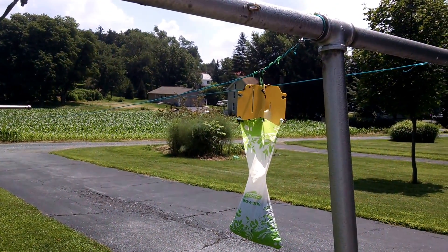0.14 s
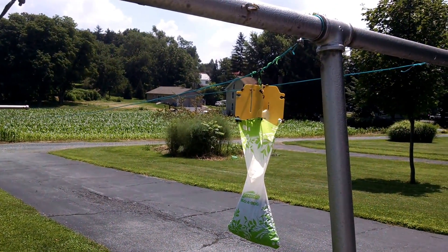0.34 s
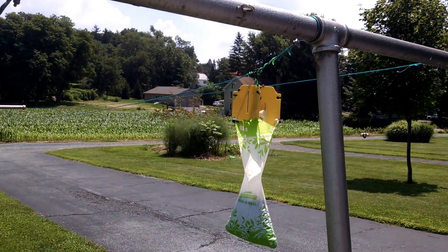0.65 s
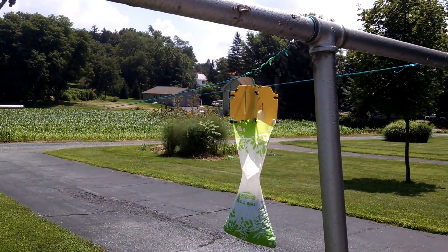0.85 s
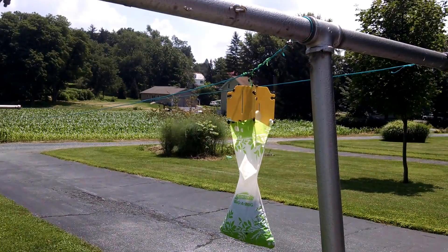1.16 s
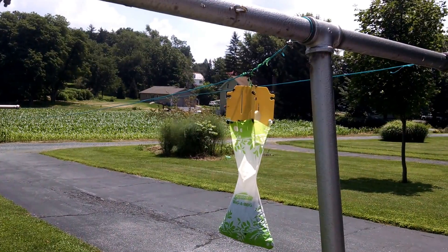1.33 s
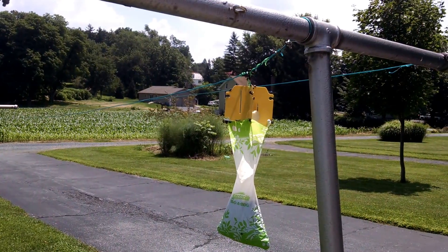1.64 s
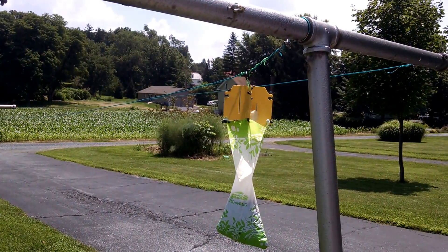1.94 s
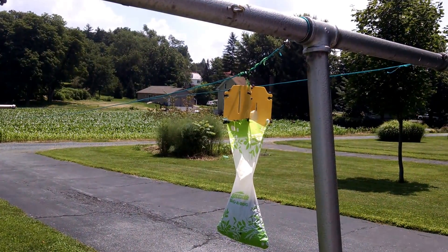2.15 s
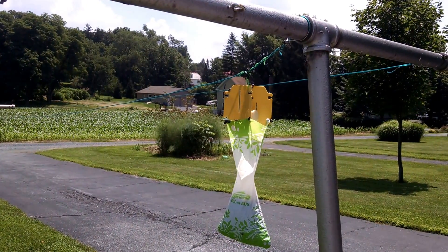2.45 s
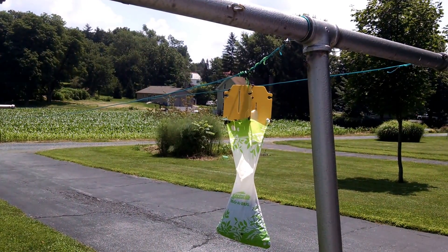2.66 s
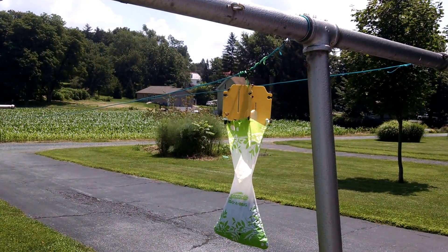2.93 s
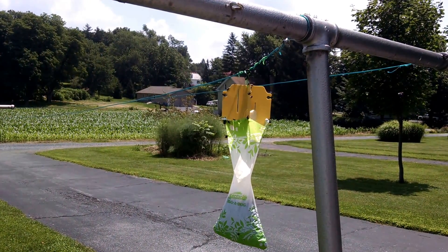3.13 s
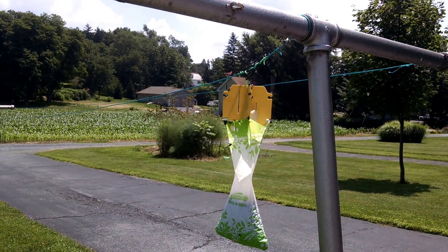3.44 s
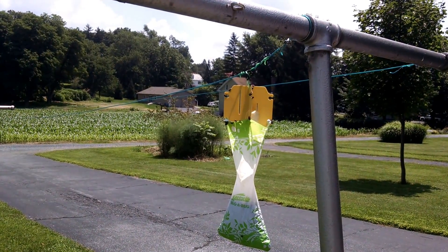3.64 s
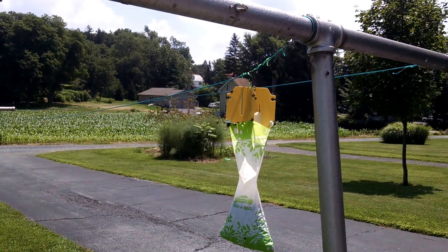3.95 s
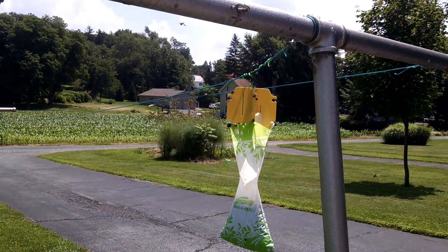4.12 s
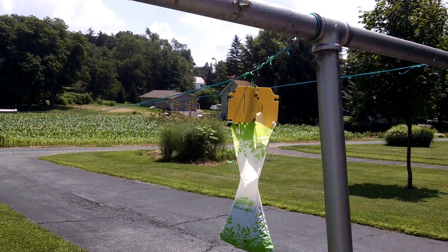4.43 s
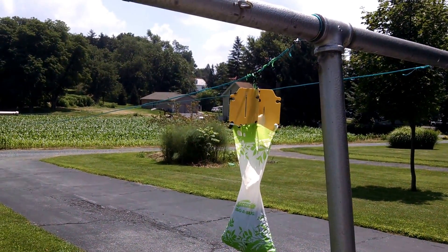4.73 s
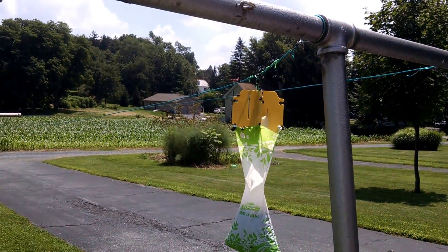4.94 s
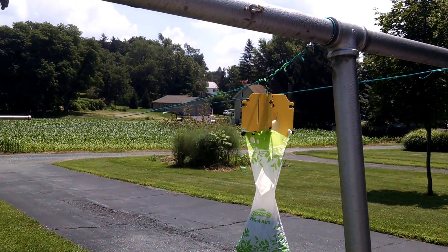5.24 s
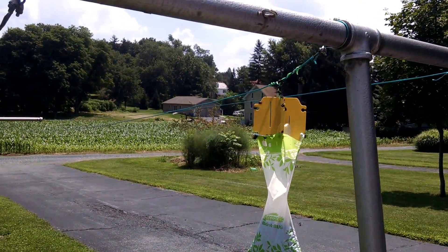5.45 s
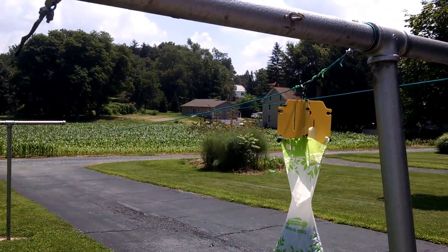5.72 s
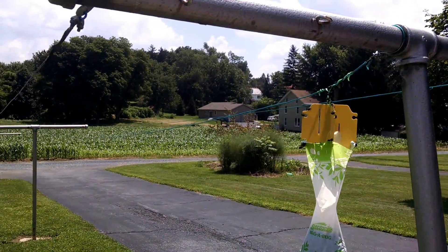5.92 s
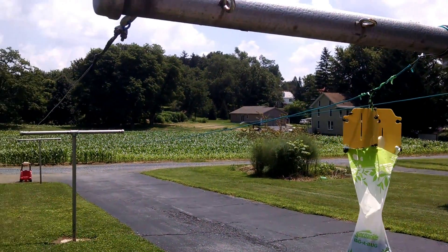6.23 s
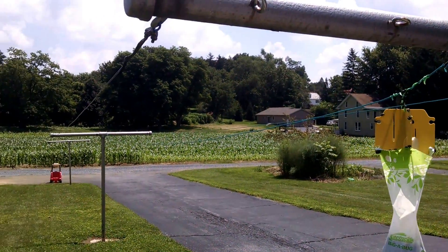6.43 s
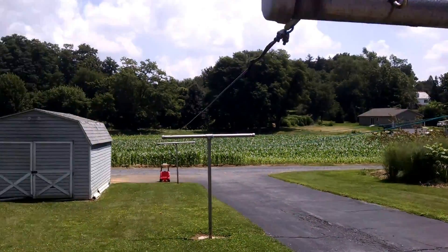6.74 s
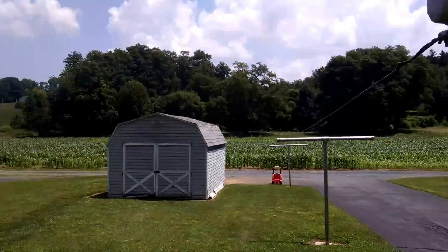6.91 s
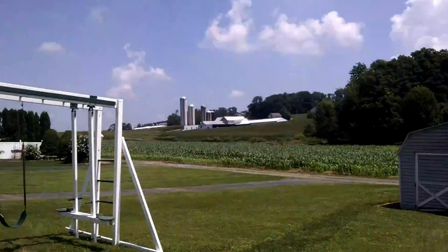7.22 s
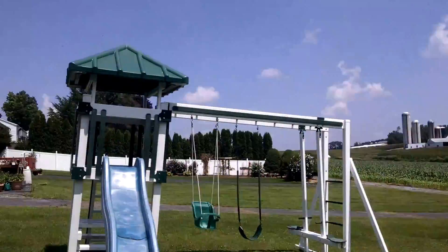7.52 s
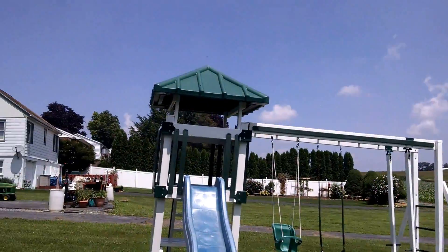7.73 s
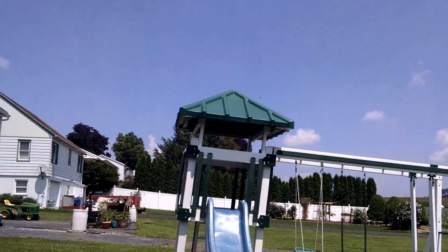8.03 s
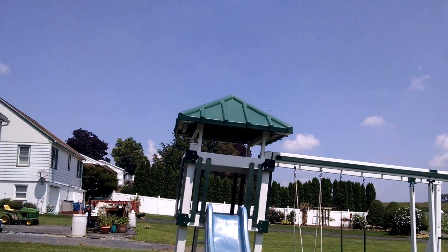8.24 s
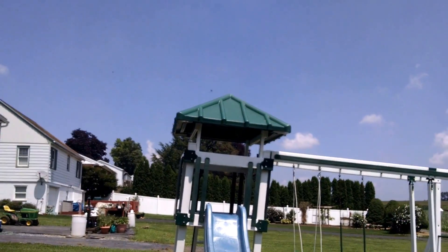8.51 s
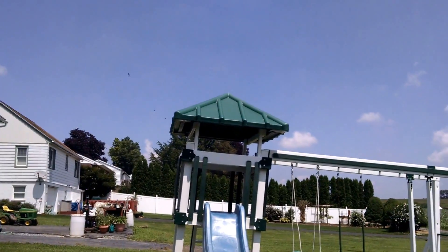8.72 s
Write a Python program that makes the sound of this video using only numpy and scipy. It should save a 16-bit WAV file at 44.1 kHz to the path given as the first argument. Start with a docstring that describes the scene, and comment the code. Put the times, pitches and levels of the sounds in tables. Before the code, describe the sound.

Hard little ticks and rattles patter close by over a low hum and chirping birds, then an insect drones past before a dry snap.

```python
"""A low machine hum, wind on the microphone ports, a broad murmur and a far bird chorus open a sunny yard scene.
Keys or tags rattle and tick close by as ringing modes; knocks and hand bumps reach the hand-held pair.
Songbirds chirp as gliding near-sines with a smeared echo; low shaft orders accompany the hum.
Late on, a beetle drones past as wingbeat harmonics with dry clatter; treble hiss rises; a snap and a scuff follow."""
import sys
import numpy as np
from scipy import signal
from scipy.fft import rfft, irfft, next_fast_len
from scipy.io import wavfile

SR = 44100
rng = np.random.default_rng(int(sys.argv[2]) if len(sys.argv) > 2 else 0)


def dump(signal):
    """Clip the signal to [-1, 1] and save it as 16-bit WAV at the path in sys.argv[1]."""
    limited = np.clip(np.atleast_2d(signal).T, -1, 1)
    pcm = np.round(limited * 32767).astype(np.int16)
    wavfile.write(sys.argv[1], SR, pcm)


N = 391166


def from_db(db):
    """Amplitude ratio of a level in dB."""
    return 10 ** (np.asarray(db) / 20)


def rms_one(x):
    """Scale to unit rms."""
    return x / np.sqrt(np.mean(x ** 2) + 1e-20)


def seconds():
    """Time of every sample."""
    return np.arange(N) / SR


def in_time(rows):
    """Join the points of each column by straight lines in time."""
    s, *columns = np.transpose(rows)
    return [np.interp(seconds(), s, column) for column in columns]


def at_hz(points, hz):
    """Read a curve by straight lines over log frequency."""
    point_hz, values = np.transpose(points)
    return np.interp(np.log(hz), np.log(point_hz), values)


def drift(rate_hz):
    """Random wander with spread 1: noise through a two-pole low-pass, run at SR / 40."""
    step, warm_up = 40, 2000
    r = np.exp(-2 * np.pi * rate_hz * step / SR)
    slow = signal.lfilter([1], [1, -2 * r, r * r], rng.standard_normal(N // step + warm_up + 2))[warm_up:]
    return np.interp(np.arange(N) / step, np.arange(len(slow)), rms_one(slow - slow.mean()))


def band_pass(x, order, low_hz, high_hz, kind="band"):
    """Butterworth band-pass, or band-stop."""
    return signal.sosfilt(signal.butter(order, [low_hz, high_hz], kind, fs=SR, output="sos"), x)


# Left-right likeness of background noise. Each row: frequency in Hz, likeness (1 same, -1 opposed).
LIKENESS = [(30, -0.66), (60, -0.72), (130, 0.52), (350, 0.49), (700, 0.68), (1200, 1), (1700, -0.044),
            (2150, 0.73), (2500, 0.82), (3100, 1), (4000, 0.98), (6000, 0.54), (15000, 0.32)]
# Band where the background noise is made the same in both channels: low edge in Hz, high edge in Hz.
ALIKE_HZ = [2150, 2950]


def banded_noise(spectrum, patchy_db, rate_hz):
    """Third-octave bands of stereo noise, each with its own level, flicker and likeness; rms 1."""
    low_hz, high_hz = spectrum[0][0], spectrum[-1][0]
    edges = np.geomspace(low_hz, high_hz, int(3 * np.log2(high_hz / low_hz)) + 2)
    white = rng.standard_normal((2, 2, N))  # neighbouring bands get unrelated noise
    shared, apart = 0, 0
    for k, (low, high) in enumerate(zip(edges, edges[1:])):
        mid, side = band_pass(white[k % 2], 2, low, high)
        centre_hz = np.sqrt(low * high)
        alike = np.clip(at_hz(LIKENESS, centre_hz), -1, 1)
        gain = from_db(at_hz(spectrum, centre_hz) + patchy_db * drift(rate_hz))
        shared = shared + gain * np.sqrt(1 + alike) * mid
        apart = apart + gain * np.sqrt(1 - alike) * side
    apart = band_pass(apart, 2, *ALIKE_HZ, kind="bandstop")
    return rms_one(shared + apart * [[1], [-1]])


def ring(clicks, hz, t60_s):
    """Two-pole resonator: a unit click sets a sine of starting height 1 ringing."""
    r, w = from_db(-60 / (t60_s * SR)), 2 * np.pi * hz / SR
    return signal.lfilter([0, np.sin(w)], [1, -2 * r * np.cos(w), r * r], clicks + 1e-18)


def struck(at_s, peak_db, pan_db, modes, spread_db, high_db=0, high_hz=12000, ring_db=0, length_s=0, count=1):
    """Each blow is a scuffle of fading contacts that excites every mode with its own random strength.

    high_db tilts the modes above high_hz; ring_db tilts those near 8.4 kHz."""
    luck = rng.normal(0, 1, (len(at_s), len(modes), count + 1))
    late = np.sort(rng.random((len(at_s), count)), axis=1) * (np.arange(count) > 0)
    contact_s = at_s[:, None] + 2 * late * np.reshape(length_s, (-1, 1))
    at = np.minimum((contact_s * SR).astype(int), N - 1)
    lag = 1.7 * luck[:, 0, :1]  # samples: each blow reaches the ports from its own angle
    out = np.zeros((2, N))
    for k, (hz, level_db, t60_s) in enumerate(modes):
        db = peak_db + level_db + spread_db * luck[:, k, 0]
        db = db + high_db * (hz > high_hz) + ring_db * (8000 < hz < 8700)
        chance = luck[:, k, 1:]
        sizes = np.where(late > 0, chance, 1.4 * np.sign(chance))  # the first contact is firm
        sizes = from_db(-11.6 * late) * sizes
        contacts = from_db(db[:, None] + 5.5) * sizes / np.sqrt(np.sum(sizes ** 2, axis=1, keepdims=True))
        clicks = np.zeros((2, N))
        for side, sign in enumerate((.5, -.5)):
            arrival = np.clip(at + (side * lag).astype(int), 0, N - 1)
            np.add.at(clicks[side], arrival, contacts * from_db(sign * pan_db)[:, None])
        out += ring(clicks, hz, t60_s)
    return out


def notes(table, wobble, burr_db, echo_db, soft=0.11, wide=0.5):
    """Near-sine notes with jittered pitch and throbbing level; far trees smear them with a noise tail."""
    out = np.zeros(N)
    jitter, throb = drift(230), drift(80)
    for glide, s, length_s, *pitches_hz, level_db in table:
        i = int(s * SR)
        u = np.linspace(0, 1, int(length_s * SR))[:N - i]
        here = slice(i, i + len(u))
        hz = glide(u, length_s, *pitches_hz) * (1 + wobble * jitter[here])
        level = from_db(level_db + burr_db * (throb[here] - throb[here].mean()))
        out[here] += np.sin(np.pi * u) ** soft * level * np.sin(2 * np.pi * np.cumsum(hz) / SR)
    tail_s = np.arange(SR // 2) / SR
    mid, side = rng.standard_normal((2, SR // 2)) * from_db(-60 * tail_s / 0.44)
    tail = (mid + wide * side * [[1], [-1]]) / np.sqrt(np.sum(mid ** 2))
    return out + from_db(echo_db) * signal.fftconvolve(out[None], tail, axes=1)[:, :N]


def glide(hz_per_s):
    """A straight pitch slope, for notes()."""
    return lambda u, length_s, hz: hz + hz_per_s * length_s * u


# Air levels, also played by far_chorus(). Each row: time in seconds, hum in dB peak, chorus in dB rms.
AIR = [(0.0, -42, -59), (0.2, -59, -55.5), (0.54, -43, -49), (0.62, -49, -51.5), (3.14, -41, -51),
       (3.6, -43.5, -55.5), (3.95, -38, -53.5), (4.55, -37.5, -63), (5.09, -44, -52), (5.9, -51.5, -56.5),
       (6.25, -45, -57), (6.57, -43.5, -51), (6.87, -44.5, -55), (8.87, -44, -49)]
# Shaft orders. Each row: frequency in Hz, mean level in dB rms.
SHAFT_ORDERS = [(117.3, -54.5), (177, -60), (234, -62.5), (351, -65), (527.6, -61.5), (587, -72)]
HUM_HZ, ORDERS_WAVER_DB = 81.8, 1.2


def machine():
    """A low engine tone that swells, and steady shaft orders that waver a little."""
    t = seconds()
    hum_db, _ = in_time(AIR)
    hum_split, order_split = np.array([[.15], [-.15]]), np.array([[.45], [-.45]])  # left, right radians
    out = from_db(hum_db) * np.sin(2 * np.pi * HUM_HZ * t + 0.71 * drift(0.8) + hum_split)
    for hz, db in SHAFT_ORDERS:
        peak = np.sqrt(2) * from_db(db + ORDERS_WAVER_DB * drift(1.2))
        out = out + peak * np.sin(2 * np.pi * hz * t + 0.6 * drift(1.6) + order_split)
    return out


# Wind colour. Each row: frequency in Hz, relative level in dB per Hz.
WIND_COLOUR = [(15, -11), (30, -3.5), (60, 0.5), (110, -14), (200, -18.5), (400, -34)]
WIND_DB, GUST_S, GUST_DB_PER_S = -42.5, 7.8, 7


def wind():
    """Puffs on the ports: low noise with a wandering level, picking up at the end."""
    gust_db = GUST_DB_PER_S * np.maximum(seconds() - GUST_S, 0)
    level = from_db(WIND_DB + gust_db + 1.94 * drift(2.6))
    return level * banded_noise(WIND_COLOUR, patchy_db=1.5, rate_hz=4.0)


# Murmur colour. Each row: frequency in Hz, relative level in dB per Hz.
MURMUR_COLOUR = [(50, -42), (120, -4.5), (300, -5), (700, -9.5), (1400, -15.5), (2000, -20), (3000, -13),
                 (5000, -25), (8000, -27), (16000, -32.5)]
MURMUR_DB = -46.5


def murmur():
    """Broad background noise, nearly steady in level."""
    return from_db(MURMUR_DB + .5 * drift(0.21)) * banded_noise(MURMUR_COLOUR, patchy_db=1.68, rate_hz=5.9)


# Far bird colour. Each row: frequency in Hz, relative level in dB per Hz.
CHORUS_COLOUR = [(1800, 33.5), (2300, -58), (2800, -11), (3400, -1), (4200, -1.5), (5000, -6), (6200, -11),
                 (7500, -17)]


def far_chorus():
    """Far birds merged into fast-flickering noise bands that follow AIR."""
    _, chorus_db = in_time(AIR)
    return from_db(chorus_db) * banded_noise(CHORUS_COLOUR, patchy_db=2.5, rate_hz=30.0)


# Hiss level. Each row: time in seconds, level in dB rms.
HISS = [(0, -76), (6.9, -79), (7.3, -55), (8.0, -55), (8.87, -54.5)]
# Hiss colour. Each row: frequency in Hz, relative level in dB per Hz.
HISS_COLOUR = [(5000, -7), (6500, -5), (8000, -12), (10000, -14), (13000, -6), (15800, -23)]


def hiss():
    """Treble noise, faint at first, rising as the microphones turn."""
    level_db, = in_time(HISS)
    return from_db(level_db) * banded_noise(HISS_COLOUR, patchy_db=3.5, rate_hz=9.6)


SHAKE_DB, SHAKE_T60_S = -13, 0.31
GRIPPED_S, GRIPPED_T60_S = 8, 0.011  # ticks are damped from this time, to this longest ring


def settling():
    """After each free tick the loose parts go on shaking, with exponential decay."""
    s, peak_db, _, _ = np.transpose(TICKS)
    free = s < GRIPPED_S
    kicks = np.zeros(N)
    kicks[(s[free] * SR).astype(int)] = from_db(peak_db[free] + SHAKE_DB)
    return signal.lfilter([1], [1, -from_db(-60 / (SHAKE_T60_S * SR))], kicks + 1e-18)


# Fine rattle between ticks. Each row: time in seconds, base level in dB.
RATTLE = [(0.0, -60.5), (0.49, -59), (0.94, -57), (1.31, -66), (2.57, -69.5), (2.99, -48.5), (3.4, -62),
          (3.98, -58), (4.91, -63), (6.2, -66), (8.87, -61.5)]
# Modes of the small hard pieces, also for ticks(). Each row: frequency in Hz, level in dB, t60 in seconds.
TICK_MODES = [(5590, -8, 0.0036), (6030, -18.5, 0.036), (7300, -19, 0.0072), (8410, -7.5, 0.029),
              (8400, -10.5, 0.017), (8890, -5, 0.005), (9130, -13.5, 0.021), (9950, -2, 0.0034),
              (10800, -11, 0.0045), (12100, -15, 0.0076), (13025, -22, .03), (13800, -11, .022),
              (14050, -11, .018), (15200, -10, 0.0033)]
# Loose pieces of two sizes: pitch ratio of each.
PIECE_PITCH = [1, .987]


def rattle(per_s, size_db):
    """Dense, uneven small touches excite the tick modes, a little lower in the larger pieces."""
    at_s = np.sort(rng.uniform(0, N / SR, int(per_s * N / SR)))
    at = (at_s * SR).astype(int)
    sizes_db = size_db * np.minimum(rng.exponential(1, len(at_s)), 4)
    high_db, ring_db = 4.0 * drift(8)[at], 5.0 * drift(8)[at] - 2
    pan_db = rng.normal(0.0, 5.0, len(at_s))
    piece = rng.integers(0, len(PIECE_PITCH), len(at_s))
    touches = 0
    for k, pitch in enumerate(PIECE_PITCH):
        own = piece == k
        modes = [(hz * pitch, db, t60_s) for hz, db, t60_s in TICK_MODES]
        touches = touches + struck(at_s[own], sizes_db[own], pan_db[own], modes, spread_db=4.0,
                                   high_db=high_db[own], ring_db=ring_db[own])
    base_db, = in_time(RATTLE)
    return (from_db(base_db) + settling()) * from_db(3.3 * drift(20)) * rms_one(touches)


# Ticks. Each row: start in seconds, contact level in dB, tilt of high modes in dB, tilt of 8.4 kHz ring in dB.
TICKS = [(.334, -34.5, 1, -4), (.355, -37, 6, -4), (.478, -40, 0, 8), (0.4977, -30.5, -8, 5),
         (0.614, -54, -8, 13), (.639, -33, 10, 7), (0.644, -45, 11, 2), (0.7758, -38.5, -8, 13.5),
         (.785, -36, 5, 7), (0.8522, -30.5, -12, 14), (0.924, -44, -2, 17), (.959, -47, -4, 7),
         (1.028, -41, 4, -4), (1.039, -39, 11, -5), (1.0543, -39, -3, 12), (1.069, -38.5, -3, 11),
         (1.122, -41, -6, 14), (1.228, -44, -2, 10), (1.3663, -38, 0, 6), (1.402, -31, 4, -6),
         (1.526, -41, -6, 0), (1.662, -41, -2, 3), (1.681, -33, 8, 4), (1.790, -41, 0, -10),
         (1.820, -50, -6, 11), (2.017, -38, -6, -11), (2.046, -40, -6, -10), (2.111, -43, -6, -10),
         (2.263, -34.5, -7, -9), (2.510, -42, -10, 1), (2.597, -39.5, -7, 9.5), (2.6216, -34, 1, -3),
         (2.71, -36, 8, 4), (2.876, -36.5, 6, -7), (3.098, -32, 3, 14), (3.13, -41, 4, 2),
         (3.261, -39.5, 7, -3), (3.332, -42, 6, -16), (3.4, -48, 7, 4), (3.428, -37, 6, 1),
         (3.454, -37.5, 5, -3), (3.746, -36, -1, -14), (3.8325, -42, 10, -10), (3.876, -42, 6, 1),
         (3.968, -35, 3, 8), (3.9718, -24.5, -1, 3), (4.044, -37, 1, 0), (4.0692, -34.5, -3, 0),
         (4.349, -39.5, -4, 0), (4.6143, -31.5, -8, 12.5), (4.626, -29.5, -6, -2), (4.645, -34, -4, 6),
         (4.914, -41, -4, 3), (4.944, -38, -7, -7), (7.292, -40, -4, -4), (8.294, -37, -10, 3),
         (8.306, -35, -6, 12), (8.325, -24, 3, 3.5), (8.337, -24, 2, 0), (8.550, -28.5, 6, 2),
         (8.563, -20, 4, 2), (8.848, -34, -13, 19), (8.863, -33, 9, 6)]


def ticks():
    """Small hard pieces collide in short scuffles; once gripped, their modes die sooner."""
    s, peak_db, high_db, ring_db = np.transpose(TICKS)
    free, pan_db = s < GRIPPED_S, rng.normal(-1.2, 3.1, len(s))
    damped = [(hz, db, min(t60_s, GRIPPED_T60_S)) for hz, db, t60_s in TICK_MODES]
    out = 0
    for some, modes, scuffle_s in ((free, TICK_MODES, .006), (~free, damped, .0035)):
        out = out + struck(s[some], peak_db[some], pan_db[some], modes, spread_db=2.5, high_db=high_db[some],
                           ring_db=ring_db[some], length_s=scuffle_s, count=10)
    return out


# Dull knocks. Each row: start in seconds, contact level in dB, left-right in dB, tilt of high modes in dB.
KNOCKS = [(0.489, -29.5, -5.5, -7.5), (0.794, -44, -17, -2), (0.836, -29, -14.5, -1), (5.042, -41, -5, 1),
          (5.3525, -47.5, 3.5, 11.5), (5.444, -34, -4, -10), (5.531, -48.5, -2.5, 15.5),
          (7.468, -42, -4, 4.5), (8.307, -33, 4, -6), (8.556, -42, -1, 5), (8.579, -35, 4, -3),
          (2.621, -45, -3, 7)]
# Knock modes. Each row: frequency in Hz, level in dB, t60 in seconds.
KNOCK_MODES = [(350, 0.5, 0.0096), (790, -6, 0.005), (1400, -3, 0.0048), (2210, -1, 0.0084),
               (3570, 1, 0.0051), (4230, -8, 0.0055)]


def knocks():
    """Dull blows: short scuffles on low, quickly damped modes."""
    s, peak_db, pan_db, high_db = np.transpose(KNOCKS)
    return struck(s, peak_db, pan_db, KNOCK_MODES, spread_db=1.5, high_db=high_db, high_hz=1800,
                  length_s=.004, count=6)


# Harsh chirrups. Each row: start in seconds, length in seconds, start pitch in Hz, level in dB.
CHIRRUPS = [(0.558, 0.041, 3370, -45), (0.918, 0.022, 3920, -44.5), (1.337, 0.037, 3500, -47.5),
            (1.457, 0.045, 3720, -46), (1.501, 0.032, 3220, -44.5), (1.863, 0.034, 3410, -46.5),
            (2.017, 0.022, 3930, -54), (2.196, 0.08, 3790, -47.5), (2.416, .02, 4300, -51),
            (3.52, 0.083, 3790, -51), (3.208, 0.014, 3200, -46), (4.623, 0.04, 3460, -46.5),
            (4.902, 0.029, 3490, -52), (5.483, 0.033, 3270, -44.5), (6.212, 0.044, 1930, -50),
            (6.693, 0.045, 3160, -50), (8.311, 0.038, 3354, -38)]
CHIRRUP_HZ_PER_S = 9500


def chirrups():
    """Falling notes made harsh by strong pitch jitter and throb."""
    table = [(glide(-CHIRRUP_HZ_PER_S), *row) for row in CHIRRUPS]
    return notes(table, wobble=.045, burr_db=5.0, echo_db=-5)


# Downsweeps. Each row: start in seconds, length in seconds, start pitch in Hz, level in dB.
SWEEPS = [(0.59, 0.045, 4760, -44.5), (0.717, 0.045, 4450, -50.5), (1.054, 0.032, 4700, -44),
          (1.113, 0.064, 4350, -51), (2.541, 0.043, 4800, -42), (2.682, 0.026, 4380, -46),
          (2.803, 0.035, 4400, -49), (4.497, 0.068, 5040, -44.5), (4.631, 0.049, 4390, -43.5),
          (4.763, 0.043, 4370, -46.5), (4.843, .018, 4820, -47), (4.872, 0.051, 4530, -44.5),
          (4.991, .05, 4450, -43.5), (5.046, 0.05, 5050, -45.5), (5.108, 0.055, 4600, -42),
          (4.897, .022, 5250, -53), (6.321, 0.07, 5220, -43.5), (6.477, 0.052, 4340, -44.5),
          (6.598, 0.047, 4290, -44.5), (6.722, 0.058, 4450, -48), (7.121, 0.054, 4180, -51),
          (8.37, .03, 4600, -49), (8.424, 0.025, 4230, -45.5)]
# Upsweeps. Each row: start in seconds, length in seconds, start pitch in Hz, level in dB.
UPSWEEPS = [(3.066, 0.017, 5900, -45), (4.2, 0.028, 3110, -43), (4.066, 0.033, 3480, -42),
            (3.18, 0.036, 3350, -44), (5.44, 0.063, 3200, -46.5), (1.7, 0.022, 3500, -55)]
# Arches, up and over. Each row: start in seconds, length in seconds, middle pitch in Hz, level in dB.
ARCHES = [(1.634, 0.063, 4320, -44), (1.871, 0.055, 4310, -46), (2.35, 0.048, 4500, -54),
          (2.734, 0.071, 4420, -46), (5.39, 0.042, 4640, -49), (8.275, 0.032, 4610, -40),
          (8.41, 0.0244, 4500, -39), (8.692, 0.032, 4460, -42)]
# Steep thin flicks. Each row: start in seconds, start pitch in Hz, end pitch in Hz, level in dB.
FLICKS = [(2.118, 3960, 5100, -46.5), (3.148, 4350, 3350, -44.5), (3.205, 4270, 3190, -45),
          (3.996, 3550, 4500, -45), (4.027, 4700, 3640, -42)]
SWEEP_HZ_PER_S, UPSWEEP_HZ_PER_S = 22000, 16000
ARCH_RISE_HZ, ARCH_DROP_HZ, FLICK_S = 480, 560, 0.0172


def whistles():
    """Clear bird notes: straight sweeps, parabolic arches and steep flicks of pitch."""
    def arch(u, length_s, hz):
        return np.polyval(np.polyfit([0, .5, 1], [hz - ARCH_RISE_HZ, hz, hz - ARCH_DROP_HZ], 2), u)

    def flick(u, length_s, start_hz, end_hz):
        return start_hz + (end_hz - start_hz) * u

    table = [(glide(-SWEEP_HZ_PER_S), *row) for row in SWEEPS]
    table += [(glide(UPSWEEP_HZ_PER_S), *row) for row in UPSWEEPS]
    table += [(arch, *row) for row in ARCHES]
    table += [(flick, s, FLICK_S, *rest) for s, *rest in FLICKS]
    return notes(table, wobble=.005, burr_db=3.5, echo_db=-7, soft=.3)


# Hand bumps. Each row: centre in seconds, pulse level in dB.
BUMPS = [(0.808, -22), (1.215, -20.5), (1.96, -21), (2.317, -17), (2.67, -20), (6.711, -19), (7.983, -23)]


def bumps(hz, length_s):
    """The hand rocks the ports against each other: a soft low cycle or two, opposed left and right."""
    out, u = np.zeros(N), np.linspace(-1, 1, int(length_s * SR))
    for (s, pulse_db), (pitch, phase) in zip(BUMPS, rng.random((len(BUMPS), 2))):
        i = int((s - length_s / 2) * SR)
        cycle = np.sin(np.pi * hz * (.75 + .5 * pitch) * length_s * u + 2 * np.pi * phase)
        out[i:i + len(u)] += from_db(pulse_db) * np.exp(-5 * u ** 2) * cycle
    return out * [[1.1], [-.9]]


# Catches of a thinner piece. Each row: start in seconds, level in dB.
THIN = [(1.038, -46), (1.69, -52), (3.099, -45), (3.255, -53), (3.975, -48), (4.63, -52)]
THIN_HZ, THIN_T60_S = 13030, 0.14


def thin_piece():
    """A thinner piece rings on in one high mode when caught."""
    s, peak_db = np.transpose(THIN)
    return struck(s, peak_db, np.full(len(s), -3.0), [(THIN_HZ, 0, THIN_T60_S)], spread_db=0,
                  length_s=.025, count=5)


# Two-note song. Each row: start in seconds, low pitch in Hz, low level in dB, high pitch in Hz, high level in dB.
SONG = [(4.572, 2370, -72, 3590, -46.5), (5.045, 2300, -53, 3700, -46), (5.37, 2550, -49, 3710, -48.5),
        (5.655, 2510, -41, 3670, -48), (5.941, 2495, -41, 3645, -46.5), (6.23, 2500, -40, 3575, -44),
        (6.507, 2450, -41.5, 3547, -47), (6.795, 2470, -43, 3610, -52), (7.095, 2380, -42.5, 3560, -65),
        (7.39, 2330, -46, 3680, -54)]
LOW_NOTE_S, LOW_SLIDE_HZ = 0.088, 260
HIGH_AFTER_S, HIGH_NOTE_S, HIGH_SLIDE_HZ = .18, 0.074, 300


def song():
    """A burry low note, then a high one, each sliding up exponentially toward its pitch."""
    def slide(u, length_s, hz, below_hz):
        return hz - below_hz * np.exp(-u / 0.144)

    table = [(slide, s, LOW_NOTE_S, hz, LOW_SLIDE_HZ, db) for s, hz, db, _, _ in SONG]
    table += [(slide, s + HIGH_AFTER_S, HIGH_NOTE_S, hz, HIGH_SLIDE_HZ, db) for s, _, _, hz, db in SONG]
    return notes(table, wobble=0.022, burr_db=4.5, echo_db=-2.0, soft=.5, wide=.1)


# Piped notes. Each row: start in seconds, length in seconds, level in dB.
PIPES = [(7.18, 0.097, -38), (7.55, 0.064, -43), (7.84, 0.1, -43.5), (8.07, 0.1, -44.5), (8.24, 0.17, -45),
         (8.37, 0.067, -46), (8.47, 0.15, -46.5), (8.58, 0.28, -46.5), (8.77, 0.031, -43)]
PIPE_HZ = 3477


def pipes():
    """Bird notes around one pitch, with slight jitter and throb."""
    table = [(glide(0), s, length_s, PIPE_HZ, db) for s, length_s, db in PIPES]
    return notes(table, wobble=0.0093, burr_db=2.8, echo_db=-9.0)


# Beetle passing. Each row: time in seconds, wingbeat in Hz, drone level in dB.
BEETLE = [(7.22, 100, -69), (7.3, 106.9, -44.5), (7.37, 118, -41.5), (7.45, 106.7, -44.5),
          (7.487, 113.6, -50), (7.58, 116.1, -48.5), (7.66, 116.3, -55), (7.75, 114, -64)]
# Wingbeat harmonics. Each row: multiple of the wingbeat, level in dB.
WING_ORDERS = [(1, -2), (2, 3), (3, -3), (4, -2.5), (5, -7), (6, -5.5), (7, -6.5), (8, -15)]
BRUSH_S, BRUSH_LENGTH_S, BRUSH_DB = 7.463, .028, -30.5  # wings brush something for about three strokes
CLATTER_S, CLATTER_DB, CLATTER_FADE_DB_PER_S = 7.57, -36, 106  # apart from the brush, loudest as it leaves


def beetle():
    """Wingbeat harmonics, so near that the ports hear them partly opposed, and a dry clatter once a stroke."""
    t = seconds()
    hz, drone_db = in_time(BEETLE)
    phase = 2 * np.pi * np.cumsum(hz * (1 + 0.01 * drift(12.4))) / SR
    phase = phase - phase[int(7.468 * SR)]  # puts a stroke peak inside the brush
    apart = np.array([[1.1], [-1.1]])
    wings = sum(from_db(db + 2.0 * drift(11)) * np.sin(k * phase + k * k + apart) for k, db in WING_ORDERS)
    drone = from_db(drone_db) * wings * from_db([[2.0], [-2.0]])

    brushing = (t > BRUSH_S) & (t < BRUSH_S + BRUSH_LENGTH_S)
    clatter_db = np.where(brushing, BRUSH_DB, CLATTER_DB - CLATTER_FADE_DB_PER_S * np.abs(t - CLATTER_S))
    stroke = (.5 + .5 * np.cos(phase)) ** 6
    scratch = band_pass(rng.standard_normal(N), 1, 8000, 11500)
    clatter = from_db(clatter_db + 3.0 * drift(60)) * stroke * scratch * from_db([[-2.0], [2.0]])
    present = (t > BEETLE[0][0]) & (t < BEETLE[-1][0])
    return present * (drone + clatter)


SNAP_S, SNAP_DB = 8.1584, -23


def snap():
    """One dry snap: a single contact on three short modes."""
    modes = [(6770, -3.5, 0.0071), (9100, 0.0, 0.0033), (13100, -10, 0.0011)]  # Hz, dB, t60 s
    return struck(np.array([SNAP_S]), SNAP_DB, np.zeros(1), modes, spread_db=2)


SCUFF_S, SCUFF_DB, SCUFF_T60_S = 8.577, -45, .2


def scuff():
    """The hand scuffs the body: a dull rough rub of band noise that dies away."""
    t = seconds() - SCUFF_S
    rub = band_pass(rng.standard_normal(N), 2, 300, 1300)
    level_db = SCUFF_DB - 60 * np.maximum(t, 0) / SCUFF_T60_S + 3.0 * drift(60)
    return (t > 0) * from_db(level_db) * rms_one(rub)


def scene():
    """Sum all sources at the two ports."""
    air = machine() + wind() + murmur() + far_chorus() + hiss()
    hard_things = rattle(per_s=1200, size_db=2.5) + ticks() + thin_piece() + snap()
    handling = knocks() + bumps(hz=67.0, length_s=0.046) + scuff()
    birds = chirrups() + whistles() + song() + pipes()
    return air + hard_things + handling + birds + beetle()


# Left-right shade. Each row: frequency in Hz, left-right difference in dB.
LEFT_SHADE = [(100, 0.5), (250, -3), (800, 0), (2550, 0), (4400, -3.5), (8000, -4), (15000, -9.5)]
# Left channel phase. Each row: frequency in Hz, phase in radians.
LEFT_PHASE = [(0, 0), (1450, -.15), (1950, -2.85), (2350, -3.1), (2750, -3.19), (3200, -4.8), (6460, -12.5),
              (6800, -12.7), (7750, -15.7), (8440, -15.9), (9220, -18.4), (12100, -24.7), (14900, -30.9),
              (22050, -45)]
CUTOFF_HZ = 16500


def record(dry):
    """The recorder's stereo: the left channel's phase is turned, its treble later and duller. The top is cut."""
    size = next_fast_len(N + 512)
    hz = np.arange(size // 2 + 1) * SR / size
    shade = from_db(at_hz(LEFT_SHADE, hz + 1) / 2)  # half the difference on each side
    turn = np.exp(1j * np.interp(hz, *np.transpose(LEFT_PHASE)))
    stereo = irfft(rfft(dry, size) * [shade * turn, 1 / shade], size)[:, :N]
    for stop_db, stop_hz in ((20, 15900), (70, CUTOFF_HZ)):
        stereo = signal.sosfilt(signal.cheby2(12, stop_db, stop_hz, fs=SR, output="sos"), stereo)
    return stereo


dry = scene()
out = record(dry)
dump(out)
```